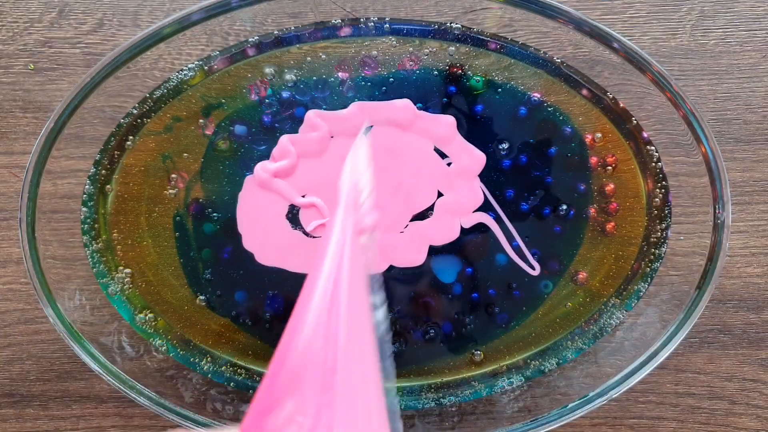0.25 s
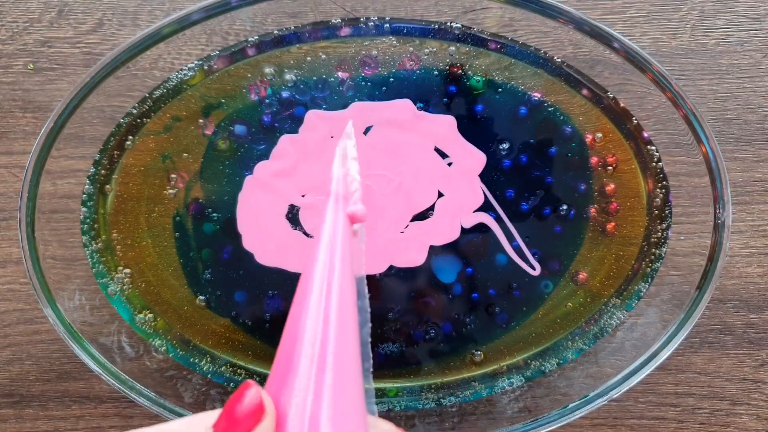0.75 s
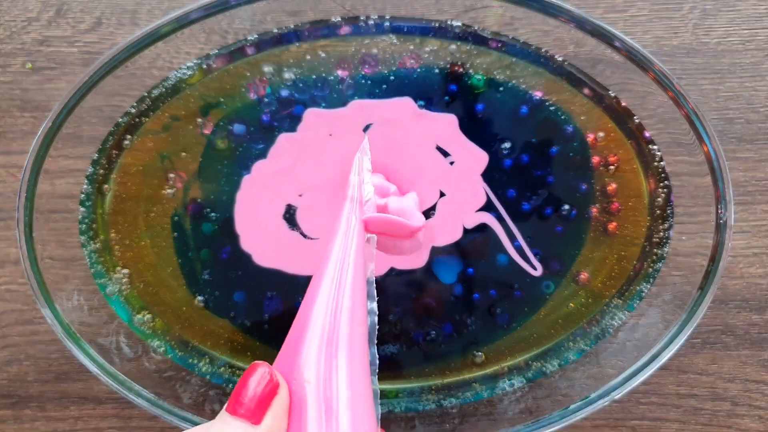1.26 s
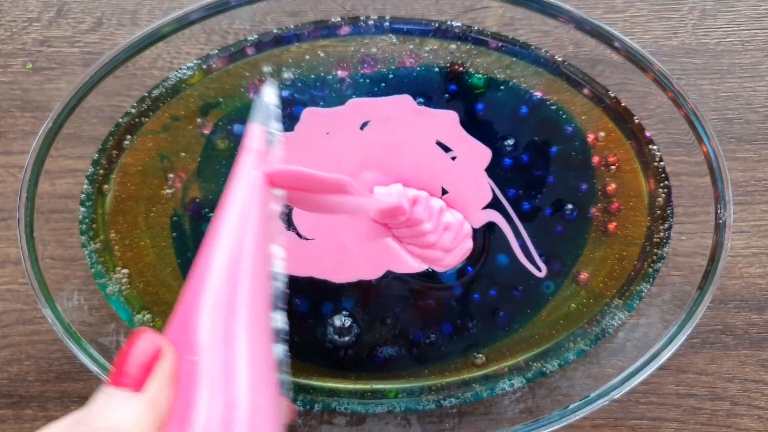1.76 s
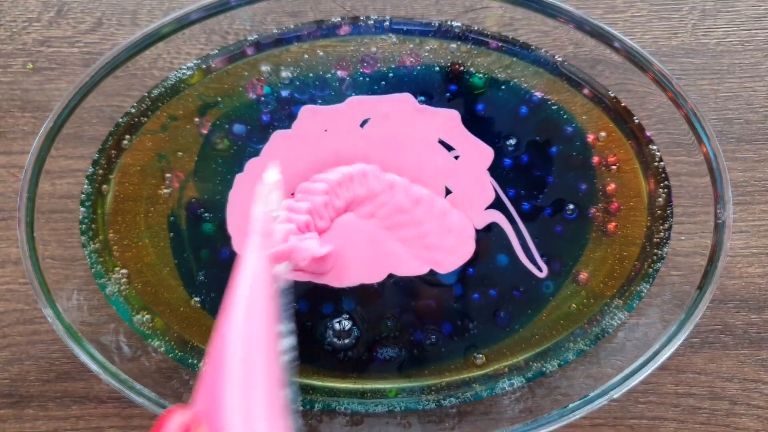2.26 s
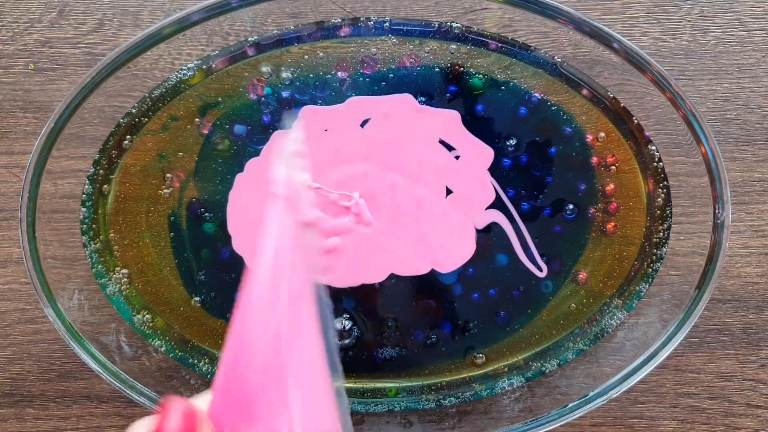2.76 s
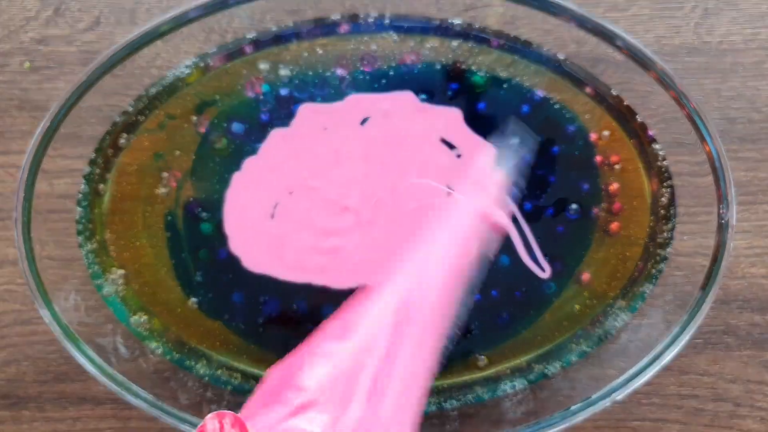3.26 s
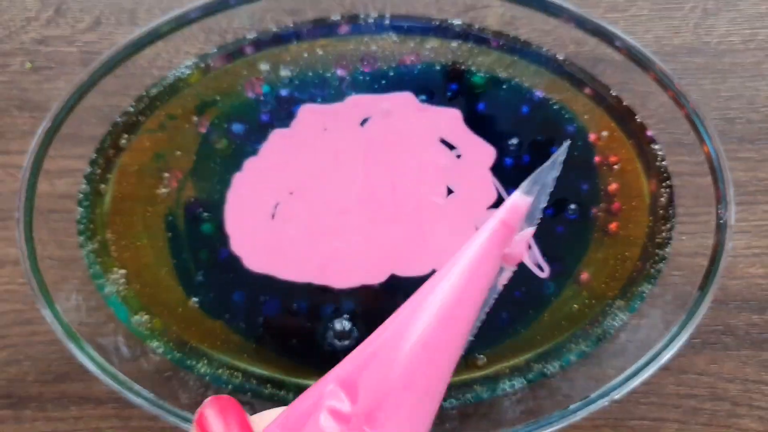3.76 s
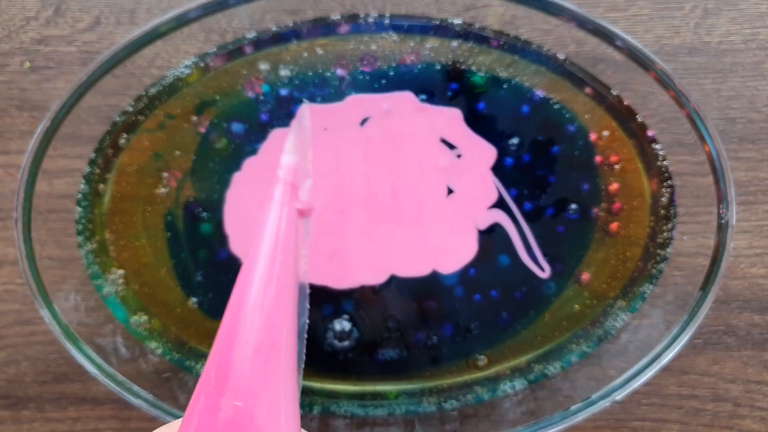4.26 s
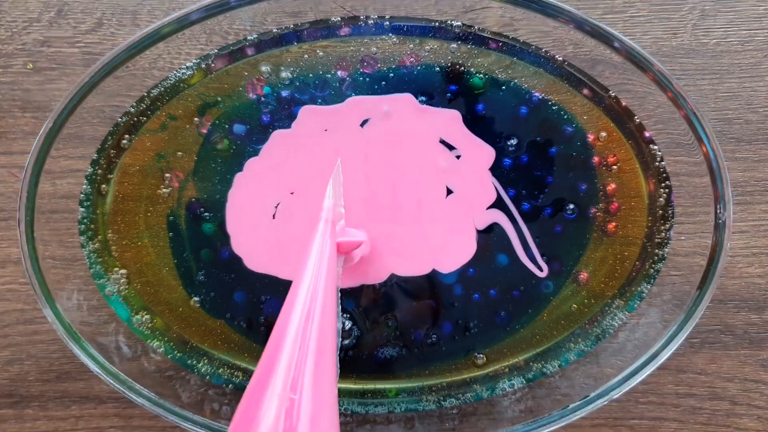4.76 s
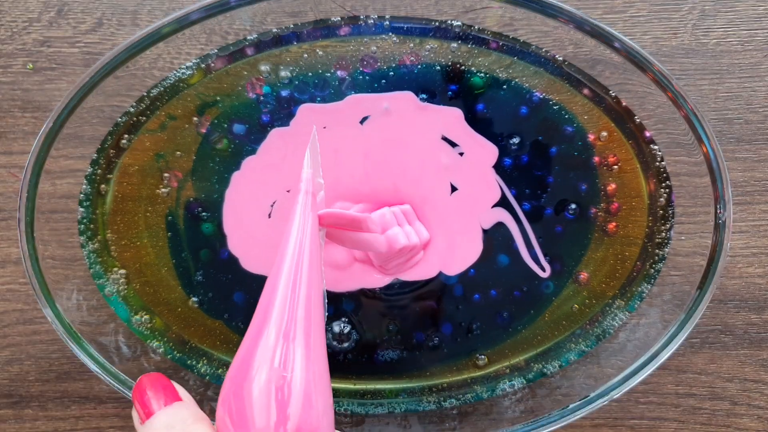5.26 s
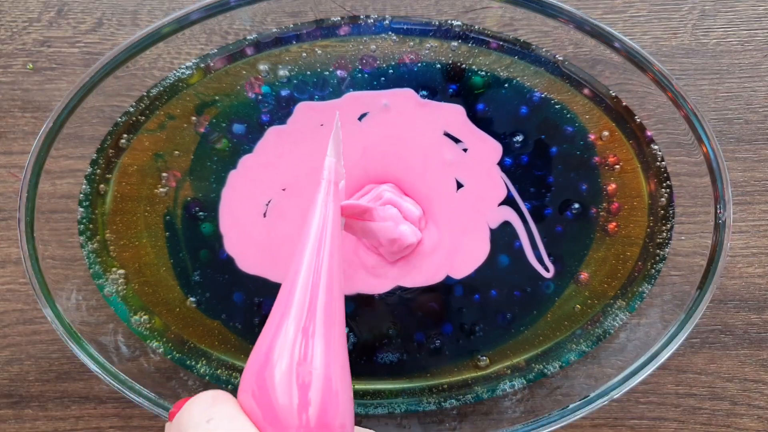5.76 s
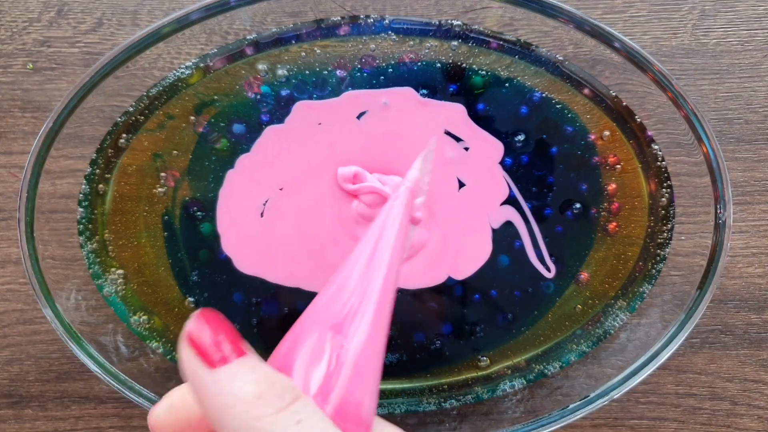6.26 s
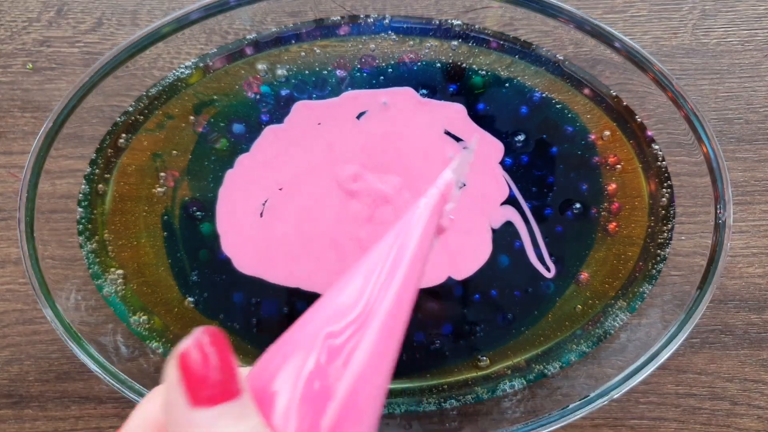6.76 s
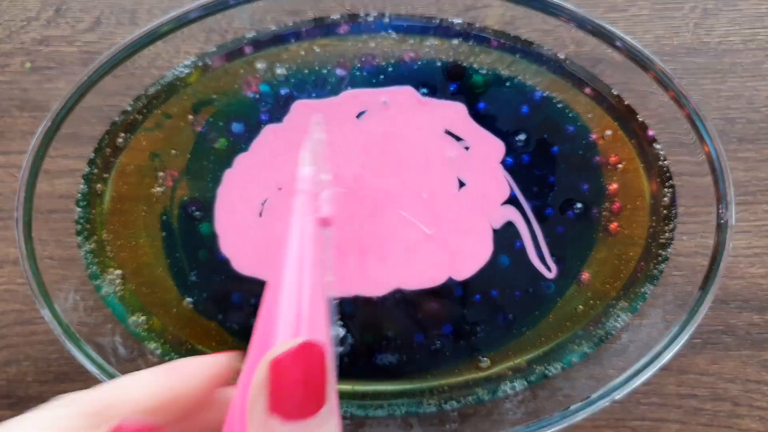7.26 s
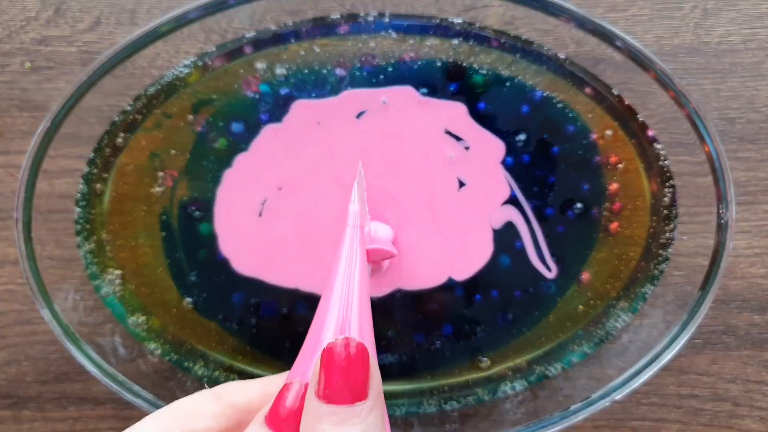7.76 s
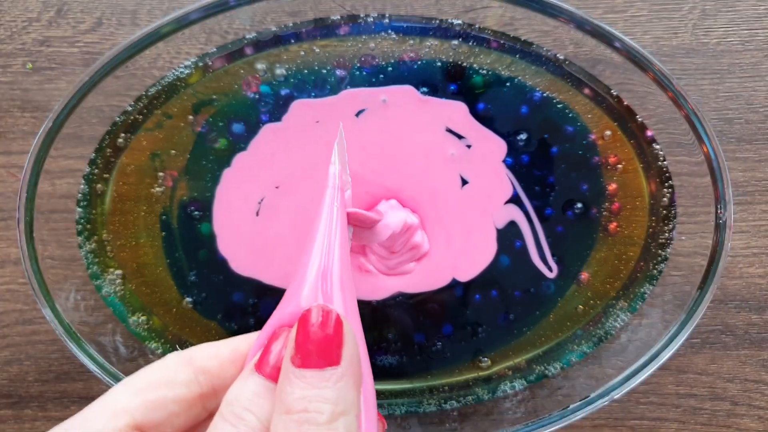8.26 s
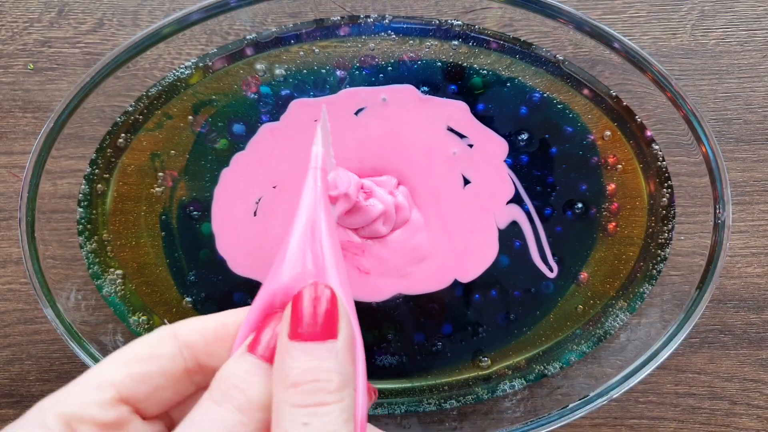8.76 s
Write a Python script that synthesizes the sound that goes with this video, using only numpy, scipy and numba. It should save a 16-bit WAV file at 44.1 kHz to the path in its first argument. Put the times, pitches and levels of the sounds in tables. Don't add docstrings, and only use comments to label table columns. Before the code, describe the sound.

Close stereo in a small room with a short tail; a faint fan hum, slightly wavering, and soft hiss run throughout. From 0 to 0.7 s thin plastic crackles crisply in short spurts, ending with a snap and a soft wet slap of paste at 0.63. One light tick follows around 0.8, then mostly hum until 2.4, when a dense flurry of bright clicks lasts about 0.3 s and thins out to 3. Isolated creases click near 3.5, 4.0 and 4.3; a low table bump comes at 4.4. A lone snap sounds at 5.67. From 6.0 to 7.1 the film crackles loudest, with hard snaps around 6.26 and 6.39, a deep table rumble at 6.3 and dull slaps to 7.1. Small ticks and a low ping around 7.9 and sparse clicks follow. At 8.37 a sharp, very bright pop bursts with a slight thud; lively crinkling from 8.75 to 9 ends it.

```python
import sys
import numpy as np
from scipy import signal
from scipy.fft import rfft, irfft, next_fast_len
from scipy.io import wavfile
from scipy.ndimage import uniform_filter1d
from numba import njit

SR = 44100
rng = np.random.default_rng(int(sys.argv[2]) if len(sys.argv) > 2 else 0)


def field_ratio(decibels):
    return 10 ** (np.asarray(decibels, dtype=float) / 20)


def put_to_file(sound):
    columns = np.atleast_2d(sound).T
    safe = np.clip(columns, -1, 1)
    whole_steps = np.round(safe * 32767)
    wavfile.write(sys.argv[1], SR, whole_steps.astype(np.int16))


N = 397782
RIGHT_LAG_S = 0.00016


def colour(x, points):
    n = next_fast_len(x.shape[-1])
    hz, db = np.transpose(points)
    log_hz = np.log(np.fft.rfftfreq(n, 1 / SR) + 1)
    gain = field_ratio(np.interp(log_hz, np.log(hz), db))
    return irfft(rfft(x, n) * gain, n)[..., :x.shape[-1]]


def level(x, db):
    return x * field_ratio(db) / np.sqrt(np.mean(x ** 2))


def curve(s, points):
    return np.interp(s, *np.transpose(points))


def walk(rate):
    k = int(SR / rate)
    steps = np.repeat(rng.standard_normal(N // k + 1), k)
    return 1.3 * uniform_filter1d(uniform_filter1d(steps, k), k)[:N]


def swells(s, start, hold, db, rise, fall):
    s = np.asarray(s)[:, None]
    lost = rise * np.maximum(start - s, 0) + fall * np.maximum(s - start - hold, 0)
    rest_db = -101
    return 10 * np.log10(np.sum(field_ratio(db - lost) ** 2, axis=1) + field_ratio(rest_db) ** 2)


@njit
def rings(s, hz, tau, size, phase, lag):
    out = np.zeros((2, N + 4000))
    for e in range(len(s)):
        for c in range(2):
            start = (s[e] + lag * c) * SR
            first = int(start) + 1
            for i in range(min(int(9 * tau[e] * SR), 3000)):
                t = (first + i - start) / SR
                swell = t / tau[e] * np.exp(1 - t / tau[e])
                out[c, first + i] += size[c, e] * swell * np.sin(2 * np.pi * hz[e] * t + phase[c, e])
    return out[:, :N]


def film(s, hz, db, pan_db, cycles, unlike):
    turn = rng.standard_normal((len(s), 2)).T
    phase = np.array([3 * turn[0], 3 * turn[0] + unlike * turn[1]])
    size = field_ratio(db + np.array([pan_db, -pan_db]) / 2)
    tau = np.maximum(cycles, .2) / hz
    return rings(np.clip(s, 0, N / SR), np.clip(hz, 100, .4 * SR), tau, size, phase, RIGHT_LAG_S)


# time in seconds, left minus right in dB.
HAND_PLACE = [(0.0, 5.5), (0.32, 3), (0.7, 6), (1.26, 17), (2.13, 1.5), (2.21, 8.5), (3.24, 6),
              (3.42, 12.5), (5.05, 3.5), (5.6, 3), (6.86, 13), (7.51, 4), (9.02, 5.5)]


def hand_pan(s):
    return curve(s, HAND_PLACE)


def crackle(level_db, centre_hz, octaves, db, spread_db, cycles, spurts_db, count):
    luck = rng.random((count, 4)).T
    s = luck[0] * N / SR
    size_db = level_db(s) + db - spread_db * np.log(1 - .999 * luck[1])
    size_db = size_db + spurts_db[(s * SR).astype(int)]
    pan_db = hand_pan(s) + 5 * (luck[3] - .5)
    hz = curve(s, centre_hz) * 2 ** (curve(s, octaves) * (luck[2] - .5))
    return film(s, hz, size_db, pan_db, cycles, unlike=1.0)


# start in seconds, hold in seconds, level in dB, fine creases above the middling ones in dB.
GRIP_SLIPS = [(0.0, 0.1, -59, -2), (0.062, 0.035, -68.5, 8), (0.282, 0.017, -63.5, -3),
              (0.347, 0.11, -65, -10), (0.555, 0.014, -62.5, -2.5), (0.637, 0.026, -58.5, -31),
              (2.431, 0.09, -57, -7), (2.637, 0.017, -59, -7), (2.817, 0.014, -58.5, -14),
              (2.992, 0.026, -68.5, -17), (3.15, 0.17, -76, -4), (3.493, 0.013, -64.5, -14),
              (3.668, 0.23, -76, -7.5), (3.972, 0.17, -67, -23), (4.114, 0.044, -64, -1.5),
              (4.303, 0.12, -68.5, -27), (5.69, .012, -69.5, 0.5), (5.973, 0.039, -66, -27),
              (6.073, 0.039, -50, -5), (6.21, 0.017, -52, -7.5), (6.309, 0.0088, -53.5, 2),
              (6.568, 0.024, -63.5, -3), (6.688, 0.2, -63, -6), (6.991, 0.076, -56, -4.5),
              (7.332, 0.041, -69, -20), (7.859, 0.13, -78, 5.5), (8.034, 0.016, -68, 3),
              (8.204, 0.1, -81, 7), (8.606, 0.031, -80.5, 12.5), (8.765, 0.065, -66.5, -1.5),
              (8.851, 0.088, -50.5, -12)]
# start in seconds, hold in seconds, level in dB.
FOLD_FLEXES = [(0.0, 0.0068, -67.5), (0.285, 0.15, -77), (0.552, 0.014, -69), (2.435, 0.18, -66),
               (2.898, 0.15, -79), (3.174, 0.017, -77.5), (3.47, 0.026, -93), (4.01, 0.16, -66.5),
               (4.346, 0.018, -77), (6.078, 0.038, -54.5), (6.211, 0.061, -63.5), (6.293, 0.012, -62),
               (6.384, 0.0068, -63), (6.63, 0.25, -67), (6.868, 0.12, -75), (7.05, 0.013, -58),
               (7.324, 0.049, -79), (8.192, 0.057, -79.5), (8.757, 0.081, -69), (8.87, 0.076, -59)]
# start in seconds, hold in seconds, level in dB.
WAD_CRUSHES = [(0.043, .006, -77), (0.066, 0.02, -79), (0.147, 0.014, -65), (0.354, 0.0041, -63),
               (0.63, 0.0082, -66), (2.426, 0.08, -57), (3.475, 0.0065, -63), (6.053, 0.0066, -55),
               (6.077, 0.015, -53), (6.114, 0.004, -48), (6.148, .006, -62), (6.292, .008, -51),
               (6.376, 0.014, -50.5), (6.703, 0.013, -58.5), (6.83, 0.022, -61), (6.939, 0.018, -67),
               (7.005, .006, -59), (7.058, 0.012, -51), (7.089, 0.012, -51.5), (8.899, 0.0088, -57)]
# time in seconds, pitch in Hz.
FOLD_PITCH = [(.9, 1610), (2.42, 2300), (2.5, 2050), (2.57, 2360), (2.68, 2770), (2.9, 1730), (4.25, 2570),
              (4.35, 1770), (6.0, 2530), (7.2, 2810), (7.8, 1800)]
# time in seconds, width in octaves.
FOLD_WIDTH = [(.9, 0.61), (2.4, 0.31), (2.55, 0.21), (2.9, 0.47), (4.2, 0.54), (6.0, 0.89), (7.2, 0.77),
              (7.8, 0.29), (9.0, .25)]
# time in seconds, pitch in Hz.
TAUT_PITCH = [(.3, 6070), (.65, 4630), (2.5, 5530), (2.83, 6620), (4.3, 4450), (6.0, 4800), (7.1, 4990),
              (8.8, 5850), (9.0, 4600)]


def rustle():
    spurts_db = 1.5 * walk(70) + 3 * walk(300)
    start, hold, slip_db, fine_db = np.transpose(GRIP_SLIPS)
    slip_rise, slip_fall = 348, 189.5

    def flex(s):
        return swells(s, *np.transpose(FOLD_FLEXES), rise=419, fall=172.5)

    def slip(s):
        return swells(s, start, hold, slip_db, slip_rise, slip_fall)

    def fine_slip(s):
        return swells(s, start, hold, slip_db + fine_db, slip_rise, slip_fall)

    def crush(s):
        return swells(s, *np.transpose(WAD_CRUSHES), rise=1500, fall=1202)

    big = crackle(flex, centre_hz=FOLD_PITCH, octaves=FOLD_WIDTH, db=-10.5, spread_db=2.5,
                  cycles=2.1, spurts_db=0.96 * spurts_db, count=12000)
    middle = crackle(slip, centre_hz=TAUT_PITCH, octaves=[(0, 1.28)], db=-6.5, spread_db=1.5,
                     cycles=1.2, spurts_db=0.63 * spurts_db, count=22000)
    fine = crackle(fine_slip, centre_hz=[(0, 10400)], octaves=[(0, 0.96)], db=-3.0, spread_db=2.5,
                   cycles=0.58, spurts_db=0.9 * spurts_db, count=30000)
    wad = crackle(crush, centre_hz=[(0, 4900)], octaves=[(0, 2.56)], db=-1.5, spread_db=2.5,
                  cycles=0.48, spurts_db=0.92 * spurts_db, count=25000)
    return big + middle + fine + wad


# time in seconds, strongest tone in Hz, its level in dB, depth of its throb from 0 to 1.
FAN_DRIFT = [(0, 631, -72, 0.33), (.9, 622.5, -71.5, 0.36), (1.5, 629.3, -71, 0.1), (2.7, 624, -70.5, 0.1),
             (3.1, 626.5, -71, 0.38), (4.4, 624.8, -72, 0.1), (5.1, 624.7, -69, 0.07),
             (5.9, 622.4, -68.5, 0.05), (6.15, 622, -67.5, 0.27), (6.3, 621.3, -69, 0),
             (6.9, 625.4, -69.5, 0.28), (7.2, 626, -66.5, 0.2), (7.6, 627.5, -69.5, 0.18),
             (8.3, 626.3, -69.5, 0.07), (9.02, 621, -70, 0)]
# multiple of the shaft rate, level in dB.
FAN_TONES = [(8, -17), (36, -21), (40, -17), (43, -22), (44, 0), (45, -24), (64, -19), (72, -15)]


def fan():
    s, hz, db, depth = np.transpose(FAN_DRIFT)
    t = np.arange(N) / SR
    turn = 2 * np.pi * np.cumsum(np.interp(t, s, hz)) / SR / 44
    throb_hz, throb_start = 14.25, 2.8
    throb = 1 + np.interp(t, s, depth) * np.cos(2 * np.pi * throb_hz * t + throb_start)
    out = 0
    for order, order_db in FAN_TONES:
        phase = 6 * rng.random() + np.array([[.42], [0]]) + .15 * walk(5)
        if order_db == 0:
            size = throb * field_ratio(np.interp(t, s, db))
        else:
            size = field_ratio(order_db - 72)
        out = out + size * field_ratio(.7 * walk(9)) * np.sin(order * turn + phase)
    return np.sqrt(2) * out * field_ratio(np.array([[-.7], [.7]]))


# frequency in Hz, density in dB per Hz.
HISS_COLOUR = [(25, -33.5), (42, -8), (80, -8), (125, -14), (200, -17.5), (400, -22.5), (600, -13),
               (800, -21), (1050, -19), (1300, -27), (1800, -31), (3700, -32.5), (6000, -38.5),
               (12500, -36), (16500, -45)]


def hiss():
    mid, side = rng.standard_normal((2, N))
    side = colour(side, [(30, -16.0), (120, -3.0), (300, -5.0), (1000, 2.5), (16000, -1.0)])
    return level(colour(np.array([mid + side, mid - side]), HISS_COLOUR), -71.5)


# start in seconds, peak in dB, ring in Hz.
LONE_TICKS = [(0.0227, -47, 4700), (0.0441, -42, 4000), (0.0494, -46, 5350), (0.0663, -40, 12800),
              (0.0859, -43, 7100), (0.1419, -42, 7400), (0.1831, -60, 5300), (0.2627, -56, 5000),
              (0.3603, -39, 5960), (0.3772, -52, 5600), (2.4884, -43, 5670), (2.5203, -41, 7100),
              (2.5612, -46, 4400), (2.5918, -47.5, 2270), (2.602, -51, 5900), (2.6304, -48, 4700),
              (2.6627, -45, 4540), (2.8275, -52, 5000), (2.8392, -49, 5900), (2.855, -56, 5700),
              (4.1287, -48, 2500), (6.1365, -43, 5400), (6.1517, -40, 6460), (6.3279, -42, 3700),
              (6.3578, -47, 4600), (6.4487, -52, 4700), (6.5617, -57, 6200), (6.5731, -62, 5100),
              (6.5882, -48, 6340), (6.5954, -56, 6000), (6.5978, -56, 5900), (6.6109, -52, 6300),
              (6.6428, -50.5, 5550), (6.6696, -46, 3860), (6.7759, -49, 4600), (6.7957, -54, 7300),
              (6.7997, -50, 11600), (6.8175, -50, 4100), (6.8197, -48, 9200), (6.8931, -46.5, 4930),
              (6.9182, -52, 3180), (6.9229, -57, 4600), (6.9341, -50, 6500), (6.9465, -45, 5100),
              (7.1005, -34, 6270), (7.1362, -50, 6600), (7.8557, -53, 4300), (8.0394, -49, 6480),
              (8.0556, -55, 6500), (8.2263, -51.5, 11000), (8.6208, -54, 12400), (8.6353, -51, 10770),
              (8.7803, -54, 5940), (8.7914, -54, 1800), (8.8097, -46, 6000), (8.8369, -44, 6900),
              (8.8585, -38, 5100), (8.887, -39, 5000), (8.912, -38, 4100), (8.9817, -45, 4700)]
# start in seconds, peak in dB, ring in Hz, run of the crease in ms.
TIGHT_CREASES = [(0.0476, -36.5, 4060, 0.86), (0.091, -40, 14700, 0.38), (0.153, -44, 4230, 0.64),
                 (0.358, -32.5, 6300, 0.92), (2.5102, -29, 7160, 0.32), (2.5869, -42, 7550, 0.25),
                 (3.4771, -43.5, 6310, 2.3), (6.0507, -27.5, 3780, 0.3), (6.214, -28.5, 6500, .15),
                 (2.55, -35.5, 4470, 1.46), (4.5836, -61, 6200, 0.44), (4.63, -55, 6640, 0.45),
                 (5.315, -55, 11250, 0.58), (5.383, -53.5, 10700, .3), (5.667, -33.5, 7150, 0.67),
                 (6.1289, -40, 4440, 0.91), (6.1471, -38.5, 6400, 1.5), (6.167, -42, 6000, .31),
                 (6.1891, -46, 6200, 0.4), (6.2058, -39, 6920, 0.6), (6.248, -37, 6520, 0.62),
                 (6.3371, -41, 4860, 0.7), (6.7435, -42, 14500, 0.17), (6.7676, -43, 11240, .44),
                 (6.869, -39.5, 5060, 0.42), (6.9534, -43, 6150, 3.4), (7.1023, -38.5, 6500, 1.3),
                 (7.9466, -42, 6850, 0.33), (8.105, -57, 5660, 0.33), (8.205, -55, 10200, 0.38),
                 (8.612, -51, 9100, 1.6), (8.853, -34.5, 4800, 0.41), (8.8935, -36, 4500, 2.4),
                 (8.9175, -27.5, 4550, 0.64)]
# start in seconds, peak in dB, ring in Hz, run in ms.
SMALL_CREASES = [(.0695, -43.5, 5900, 0.39), (.099, -45, 7000, 0.51), (.1243, -53, 7100, 0.27),
                 (.282, -51, 4400, 0.26), (.294, -56, 2010, 0.37), (.3035, -49, 6700, .3),
                 (.541, -55, 1510, .3), (.574, -48.5, 1500, 0.46), (2.441, -41, 4640, 0.36),
                 (2.4843, -42, 7600, .4), (2.611, -48, 6470, 0.25), (2.656, -47, 4700, 0.35),
                 (2.783, -54, 7995, 0.42), (2.8197, -45.5, 6100, .8), (2.8445, -47, 6140, 0.83),
                 (3.062, -55, 2400, 0.28), (3.949, -59, 3970, 0.34), (4.276, -51.5, 2590, 0.44),
                 (4.338, -52, 6170, 0.18), (5.947, -54, 4530, 0.18), (5.955, -54, 4300, 0.22),
                 (5.99, -57, 7000, .2), (6.012, -54, 5500, .2), (6.025, -56, 5500, 0.18),
                 (6.0345, -49, 5500, .3), (6.0408, -47, 6000, 0.28), (6.711, -51, 5970, .3),
                 (6.9423, -45.5, 3606, 0.43), (6.0475, -48, 5000, .2), (6.201, -48, 7500, .2),
                 (6.3035, -40, 9000, 0.43), (6.3205, -43, 10500, .3), (6.3445, -42, 10000, .5)]
# start in seconds, peak in dB, ring in Hz, run in ms.
PLAIN_CREASES = [(0.1447, -37, 7700, 0.63), (0.6717, -34, 3960, .36), (2.4234, -46, 4800, 0.45),
                 (2.5284, -46, 4353, 0.51), (2.6335, -41, 4870, 0.23), (3.5263, -42, 4380, 0.13),
                 (3.9732, -46, 4770, 0.24), (4.0823, -48, 4100, .63), (4.3548, -41, 4500, 0.12),
                 (4.3636, -50, 1780, 1.2), (5.9624, -49.5, 4400, 0.23), (7.3274, -49, 4700, .3),
                 (6.2642, -25.5, 4600, 0.38), (6.3734, -37, 3860, 0.89), (6.6477, -36, 4570, 0.11),
                 (6.6791, -44, 3350, 0.36), (6.9976, -33.5, 3100, .25), (7.013, -44, 3830, .39),
                 (7.3274, -51.5, 1217, 0.49), (8.8029, -42, 6150, 0.23), (8.841, -46, 5060, 2.3),
                 (8.8612, -38, 4700, 1.8), (9.0093, -48, 3740, 1.3), (9.0172, -43, 4270, 0.4)]
# start in seconds, peak in dB, ring in Hz, run in ms.
SHARP_CREASES = [(0.4053, -46, 5100, 0.23), (0.4252, -44.5, 5800, 0.38), (0.5272, -55, 6560, .3),
                 (2.454, -40, 4400, 1.8), (2.4994, -32.5, 7500, 1.35), (4.0173, -41, 4800, 0.21),
                 (4.2828, -51, 4700, 0.13), (4.3019, -47, 6000, .28), (4.415, -48, 5600, 0.3),
                 (6.079, -34, 3200, 0.9), (6.2914, -29.5, 4360, 0.67), (6.2945, -28, 4600, 0.4),
                 (6.3767, -39, 4060, 1.2), (6.3861, -20.5, 4460, 0.28), (6.8891, -47, 6600, 1.4),
                 (7.0536, -36.5, 10500, 0.61), (8.0302, -47, 1540, 0.47), (8.7596, -52, 1820, 0.95),
                 (8.891, -27, 4800, 0.21), (8.9605, -38, 5920, 1.9), (8.965, -35.5, 3383, 0.81),
                 (8.9916, -33.5, 4140, 0.64)]
# start in seconds, peak in dB, ring in Hz, run in ms.
LOOSE_CREASES = [(0.463, -51, 1350, 1.13), (0.5584, -45, 6960, .23), (0.626, -29.5, 4240, 0.96),
                 (0.6359, -40, 1330, 0.86), (0.7994, -50, 2020, 0.44), (0.9004, -58, 4000, 0.22),
                 (0.9432, -58, 4030, 0.18), (2.46, -40, 2300, 0.8), (3.304, -56, 3620, 2.9),
                 (3.85, -54, 815, 0.33), (6.1008, -30, 5300, 0.26), (6.1503, -45, 6600, 1.1),
                 (6.695, -38, 3240, 0.3), (6.7528, -42.5, 4470, 0.28), (6.7621, -46, 3100, .8),
                 (6.113, -27, 4000, 0.3), (6.2179, -31.5, 6600, 0.44), (6.828, -37, 3030, 0.18),
                 (6.842, -38, 2920, 0.28), (6.9561, -41.5, 3160, 0.77), (7.0631, -40, 6800, 2.9),
                 (7.0655, -40, 2620, 1.5), (6.0684, -42, 5000, .4), (7.094, -35, 6500, 2),
                 (7.5939, -46.5, 2100, 0.51), (7.8657, -51, 1786, 0.9)]
# low tick in dB, high tick in dB.
CREASE_TICKS = [
    (-7, -23),
    (-16, -0.5),
    (1.5, -24),
    (-1.5, -2.5),
    (-18, -7),
    (-21.5, -4.5),
]


def snaps():
    lone = np.c_[LONE_TICKS, np.full(len(LONE_TICKS), 0.25)]
    kinds = PLAIN_CREASES, TIGHT_CREASES, LOOSE_CREASES, SHARP_CREASES, SMALL_CREASES, lone
    s, db, hz, run_ms = np.concatenate(kinds).T
    low_db, high_db = np.repeat(CREASE_TICKS, [len(kind) for kind in kinds], axis=0).T
    pan_db, run_ms = hand_pan(s) + 1.3, np.clip(run_ms, .15, 2.5)
    luck, scatter = rng.random((len(s), 16)).T, rng.standard_normal((len(s), 20)).T

    out = film(s, hz, db - 5.5, pan_db, cycles=0.58 + 0.00015 * hz, unlike=0.099)
    body_db = db - 6.5 + 7 * np.log2(np.minimum(hz / 3000, 1)) - 13 * np.log2(np.maximum(hz / 5000, 1))
    out = out + film(s, 4500 * 2 ** (luck[0] - .5), body_db, pan_db, cycles=0.74, unlike=0.43)

    out = out + film(s, 1600 * 2 ** (luck[1] - .5), db + low_db - 12.5, pan_db, cycles=0.27, unlike=1.0)
    for k in range(2):
        tick_s, tick_hz = s + 0.0017 * luck[2 + k], 9500 * 1.02 ** luck[4 + k]
        out = out + film(tick_s, tick_hz, db + high_db - 4.5, pan_db, cycles=0.51, unlike=4.0)

    fade_db_per_ms = 1.5
    for k in range(10):
        high = k % 2
        near_hz = np.where(high, 10500, np.maximum(hz, 1600))
        near_hz = near_hz * np.where(hz < 2500, 1.07, 1.2) ** scatter[10 + k]
        late_ms = 3.6 * np.sqrt(run_ms) * (np.abs(scatter[k]) - .25)
        near_db = db + high * high_db + 7 * np.log10(run_ms) - 6.5 - 7 * luck[6 + k]
        near_db = near_db - fade_db_per_ms * np.abs(late_ms) / np.sqrt(run_ms)
        near_s = s + 0.000323 + late_ms / 1000
        out = out + film(near_s, near_hz, near_db, pan_db, cycles=0.95, unlike=1.4)
    thin = signal.butter(2, 750, "high", fs=SR, output="sos")
    return signal.sosfilt(thin, out)


# start in seconds, peak in dB, ring in Hz, left minus right in dB.
PASTE_SLAPS = [
    (0.632, -56, 1530, 4),
    (0.635, -40.5, 1230, 6),
    (0.799, -52.5, 960, 8),
    (6.384, -43, 696, 4),
    (6.956, -57.5, 1200, 10),
    (7.0906, -49, 725, 3),
    (7.102, -42.5, 1400, 8),
    (8.63, -53, 590, 3),
]


def slaps():
    s, db, hz, pan_db = np.transpose(PASTE_SLAPS)
    return film(s, hz, db + 0.5, pan_db, cycles=0.74, unlike=0.71)


# start in seconds, hold in seconds, level in dB, dying away in dB per second.
ARM_BUMPS = [
    (4.442, 0.098, -67, 205),
    (6.312, 0.15, -55, 62),
    (6.65, 0.021, -65, 43),
    (7.074, .03, -78, 300),
    (8.39, 0.0089, -66.5, 276),
]
# frequency in Hz, width in Hz, level in dB.
TABLE_MODES = [
    (52.6, 9, 0.5),
    (74.3, 2.5, 20),
    (89.5, 12, -30.5),
]


def table():
    push = rng.standard_normal(N)
    body = 0
    for hz, width, db in TABLE_MODES:
        body = body + field_ratio(db) * signal.lfilter(*signal.iirpeak(hz, hz / width, SR), push)
    start, hold, db, fall = np.transpose(ARM_BUMPS)
    arm_db = swells(np.arange(N) / SR, start, hold, db, rise=500, fall=fall)
    return level(body, -1.24) * field_ratio(arm_db + np.array([[-.3], [.3]]))


# start in seconds, peak in dB, ring in Hz.
FOLD_PINGS = [
    (7.8655, -51.5, 1810),
    (8.632, -59, 1660),
    (8.7585, -58, 1800),
]


def pings():
    s, db, hz = np.transpose(FOLD_PINGS)
    return film(s, hz, db, hand_pan(s), cycles=2.2, unlike=1.0)


# frequency in Hz, density in dB per Hz.
POP_COLOUR = [(100, -32.5), (400, -42.5), (850, -25), (1250, -33.5), (1700, -31.5), (2300, -32),
              (3700, -30), (5300, -25), (9800, -14.5), (11300, -18.5), (13300, -9), (15000, -13),
              (16400, -40)]
# frequency in Hz, left minus right in dB.
JET_SIDES = [(2000, 2), (7000, 1), (12000, 4.5), (13300, 3.5), (16000, -1)]


def pop():
    pop_s, pop_db = 8.3694, 8.5
    whistle_hz, whistle_db = 13330, -1.5
    t = np.maximum(np.arange(N) / SR - pop_s, 0)
    shape = (t / .0009) ** 3 * np.exp(-t / .0009)
    shared, own = rng.standard_normal(N), rng.standard_normal((2, N))
    air = rfft(shape * (shared + 0.95 * own))
    air = air / np.sqrt(uniform_filter1d(np.abs(air) ** 2, size=N // 50))
    air = colour(irfft(air, N), POP_COLOUR)
    lag_s, lag_phase = np.array([[0], [RIGHT_LAG_S]]), np.array([[0], [.55]])
    whistle = np.roll(shape, 15) ** 1.2 * np.sin(2 * np.pi * whistle_hz * (t - lag_s) - lag_phase)
    jet = (level(air, 0) + level(whistle, whistle_db)) * field_ratio(pop_db - 2.5) / np.sqrt(N)
    left = colour(jet[0], np.array(JET_SIDES) * [1, .5])
    right = colour(jet[1], np.array(JET_SIDES) * [1, -.5])
    return np.array([left, right])


def walls():
    t60_s, tail_db = 0.27, -10
    t = np.arange(int(.6 * SR)) / SR
    tail = rng.standard_normal((2, len(t))) * field_ratio(-60 * t / t60_s)
    tail = tail * np.clip(t / .028, 0, 1) ** .6
    return tail * field_ratio(tail_db) / np.sqrt(np.sum(tail ** 2) / 2)


# frequency in Hz, gain in dB.
WALL_COLOUR = [(300, 10.5), (1000, 4), (2700, -3.5), (3900, -3.5), (5200, -5), (8000, -3), (13400, -6.5),
               (16000, -5.5)]


def room(x, tail):
    return signal.fftconvolve(colour(x, WALL_COLOUR), tail, axes=1)[:, :N]


# frequency in Hz, gain in dB.
BOWL_COLOUR = [(1800, -5), (2300, -12), (2750, 3.5), (3200, -4.5), (3700, 7.5), (4300, 10), (5150, -2.5),
               (6000, 4), (6800, -2)]


def scene():
    burst, around, tail = pop(), table() + fan() + hiss(), walls()
    bag = rustle() + slaps() + snaps() + pings()
    far = field_ratio(7) * colour(burst, BOWL_COLOUR)
    echo_s, echo_db = .0078, -16.5
    echo = np.roll(colour(far + field_ratio(-1) * bag, WALL_COLOUR), int(echo_s * SR), axis=1)
    echo = echo * field_ratio(echo_db + np.array([[3], [-3]]))
    return bag + burst + echo + room(bag + far, tail) + around


def band_limit(x):
    return signal.sosfilt(signal.butter(12, 16500, fs=SR, output="sos"), x)


def record(dry):
    cut = signal.ellip(8, .2, 60, 16400, fs=SR, output="sos")
    mix = signal.sosfilt(cut, dry)
    return band_limit(mix)


dry = scene()
out = record(dry)
put_to_file(out)
```